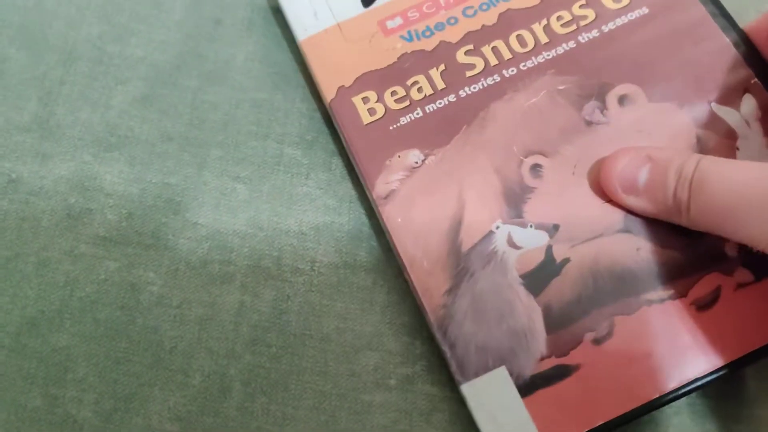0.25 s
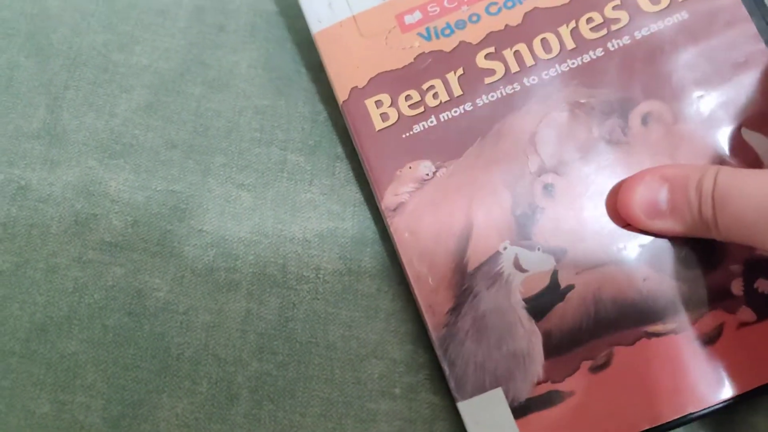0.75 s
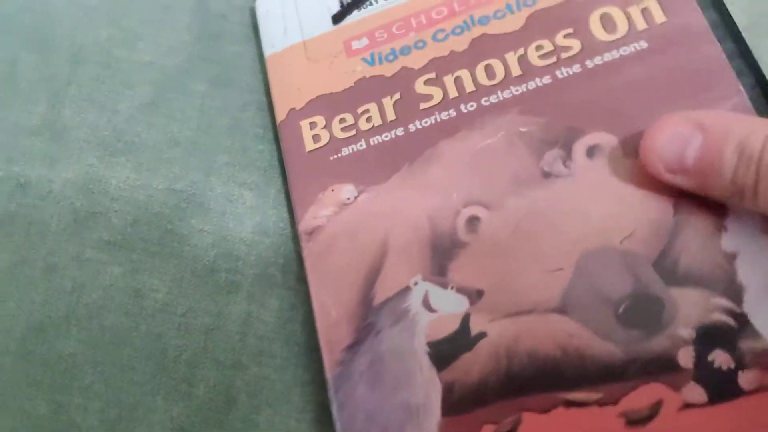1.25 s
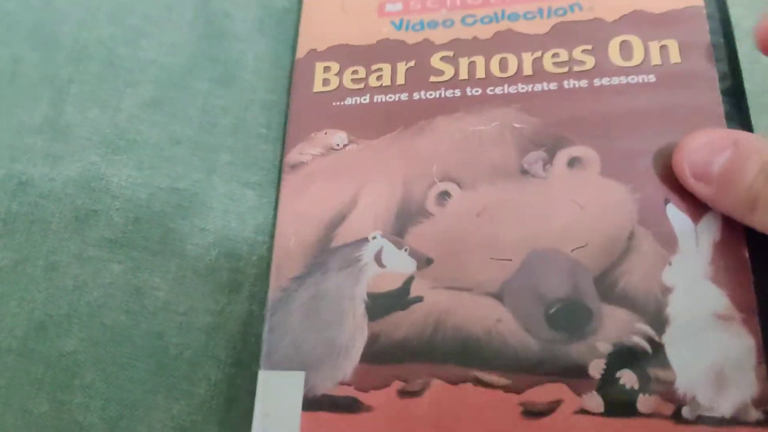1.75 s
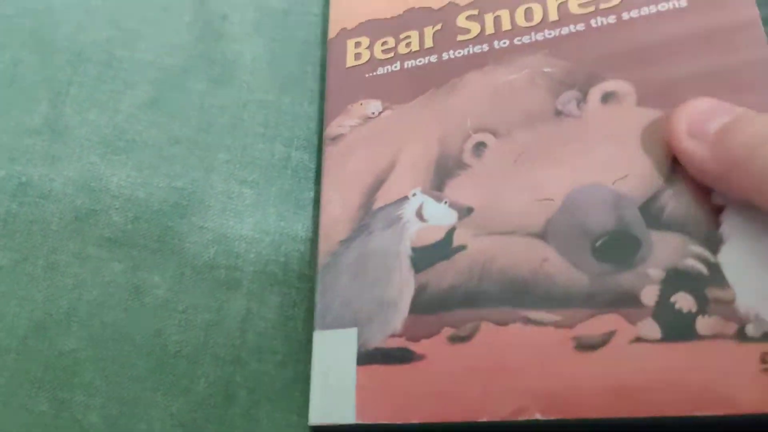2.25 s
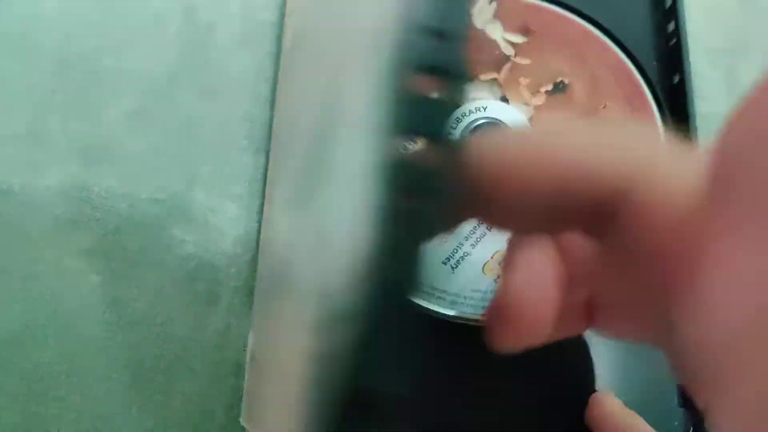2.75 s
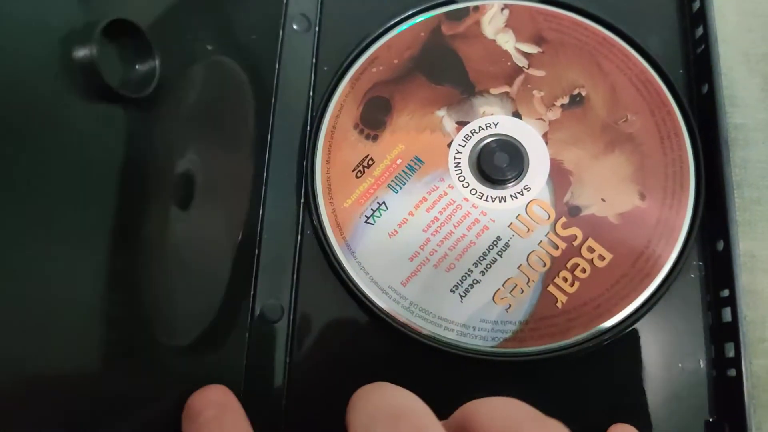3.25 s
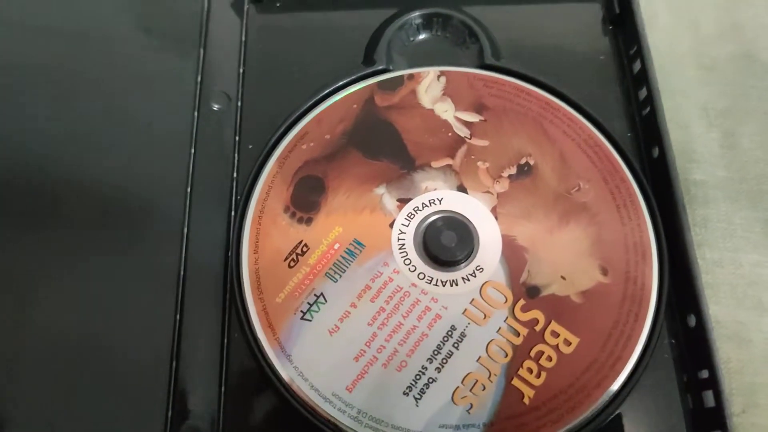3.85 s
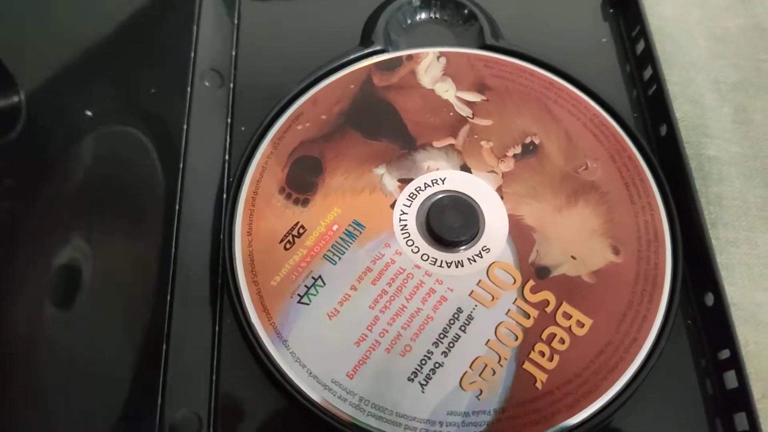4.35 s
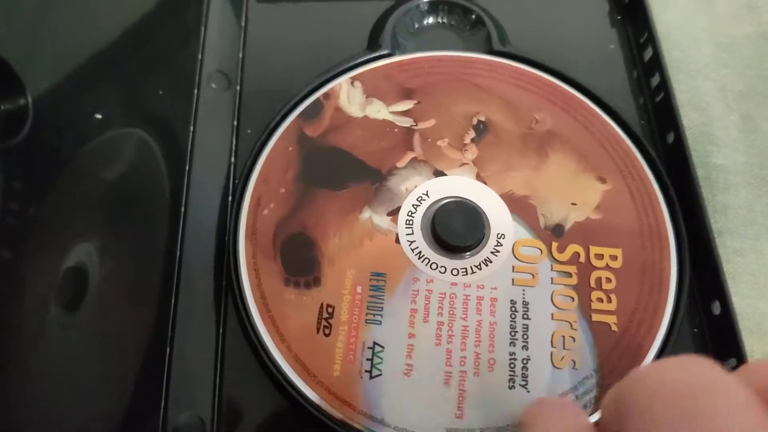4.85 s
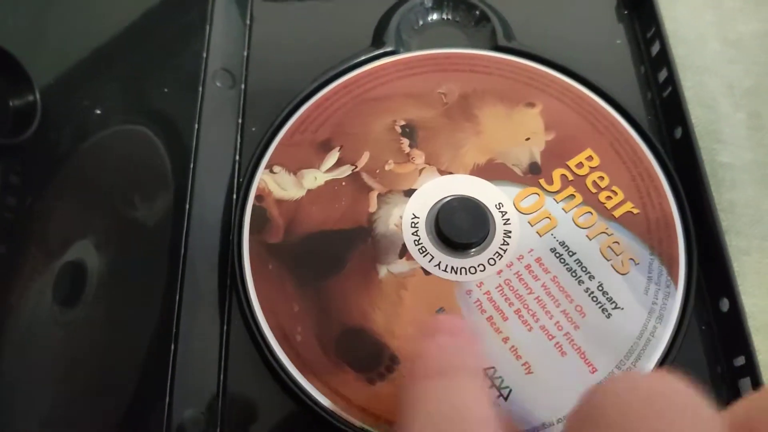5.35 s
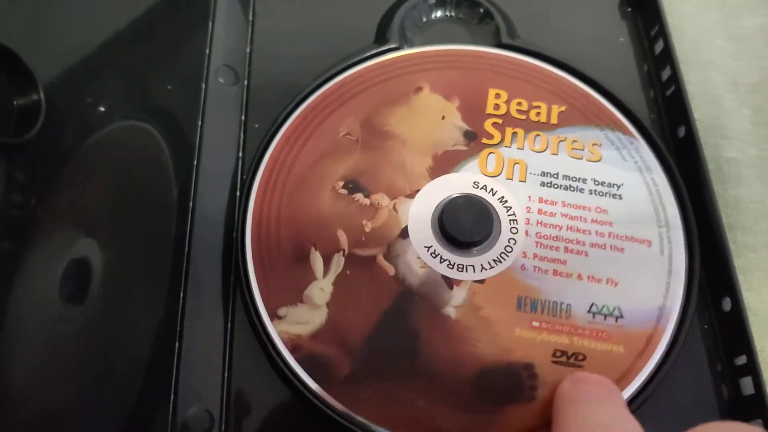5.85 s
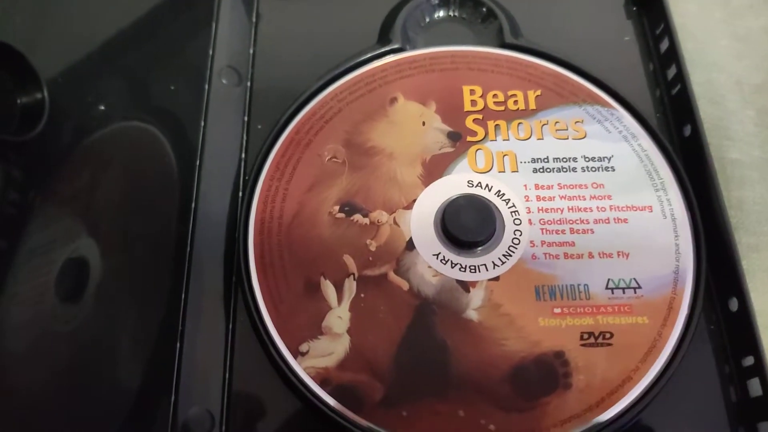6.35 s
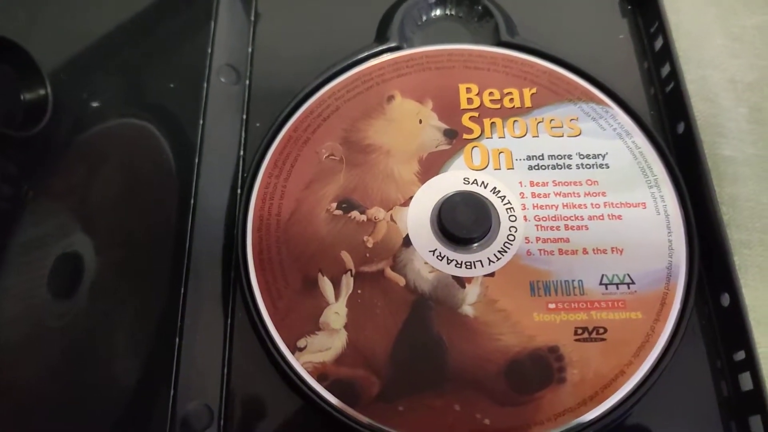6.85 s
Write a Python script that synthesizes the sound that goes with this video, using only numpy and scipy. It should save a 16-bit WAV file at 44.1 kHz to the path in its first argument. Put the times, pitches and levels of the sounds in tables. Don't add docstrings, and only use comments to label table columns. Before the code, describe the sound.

A hollow plastic disc case drops on cloth with a sharp clattering rattle, then soft knocks, faint hinge ticks and bright disc clacks.

```python
import sys
import numpy as np
from scipy import signal
from scipy.fft import rfft, irfft
from scipy.io import wavfile

SR = 44100
rng = np.random.default_rng(int(sys.argv[2]) if len(sys.argv) > 2 else 0)


def wav_out(sig):
    wavfile.write(sys.argv[1], SR, np.round(np.clip(np.atleast_2d(sig).T, -1, 1) * 32767).astype(np.int16))


def ratio(d):
    e = np.asarray(d, float) / 20
    return 10 ** e


N = 313110

# frequency in Hz, left over right in dB.
THIN_PARTS_LEAN = [(60, 4.5), (180, 5.9), (550, 12.9), (1650, 16.2), (4970, 16.8), (15000, 6.23)]


def case():
    # frequency in Hz, level in dB.
    shell_modes = [(65, -9), (115, -6), (155, -4.5), (190, -3.5), (250, -5), (330, -6.5), (470, -20.5),
                   (630, 0.5), (765, 3), (960, 3), (1200, -1.5), (1340, -1), (1600, -3), (1780, 0.5),
                   (2100, -2.5), (2350, -2.5), (2650, 0), (2950, -1), (3250, 0.5), (3600, -11.5),
                   (3950, -2), (4400, -11), (4800, 7), (5200, -0.5), (5600, -39), (6300, -7.5),
                   (7200, -24.5)]
    # frequency in Hz, left over right in dB.
    shell_lean = [(60, -2.5), (180, 3), (550, -1), (1650, 18), (4970, 7), (15000, -5.5)]
    # peak in seconds, level in dB, rise and fall in seconds,
    # treble in dB above that level.
    drags = [(0.01, -64, 0.096, 0.24, 2.1), (.46, -61.5, 0.12, 0.091, -3.5),
             (.64, -67.5, 0.027, 0.21, -5.5), (1.003, -34.5, .004, 0.27, -7.5),
             (1.092, -38, 0.075, 0.078, 5), (1.19, -48.5, 0.088, .13, -8), (1.334, -46, 0.0099, 0.076, 0.5),
             (1.419, -57, .1, 0.18, -4.5), (1.782, -52, .2, 0.13, -4), (1.858, -52, 0.083, 0.037, 2.5),
             (2.01, -66, 0.27, 0.39, -5.5), (2.43, -69.5, 0.15, 0.32, 2.5),
             (2.709, -66.5, 0.073, 0.054, 4.5), (3.6, -67.5, 0.24, 0.59, 2)]
    # time in seconds, peak in dB, thump and treble in dB above the peak.
    grip_shifts = [(0.017, -30, -13, -35), (0.03, -39.5, -33, -30), (0.054, -52.5, -9, -12),
                   (0.095, -47, -12, -8), (0.112, -39.5, -33, -25), (0.127, -48, -32, -30),
                   (0.172, -41.5, -38, -6.5), (0.258, -40.5, -20, -19.5), (0.267, -47.5, -2, -19),
                   (0.334, -50, -10, -36), (0.365, -47.5, -20, -9), (0.38, -40, -12, -16.5),
                   (0.456, -38.5, -4, -7.5), (0.467, -39, -4.5, -34), (0.61, -34.5, -4.5, -0.5),
                   (0.634, -62, -9, -4), (0.708, -52, -1, -10)]
    # time in seconds, peak in dB, thump and treble in dB above the peak,
    # favoured mode in Hz.
    drop_knocks = [(0.882, -44.5, -16, 1.5, 1643), (0.915, -44, -21, -6, 700),
                   (0.998, -14, 3.5, -17.5, 624.7), (1.005, -24.5, 4, -0.5, 505.5),
                   (1.011, -29, -10, -6, 595.6), (1.03, -25.5, -14.5, -10.5, 711.5),
                   (1.041, -23.5, 0, 2, 1103), (1.052, -20, -27, 2, 1238), (1.068, -10, -0.5, -2, 960),
                   (1.074, -9.5, -7, -8, 967), (1.084, -22.5, -22.5, 1.5, 1197),
                   (1.094, -21.5, -12.5, -7.5, 631.7), (1.104, -24.5, -24.5, -11.5, 1222),
                   (1.124, -31, -4, -1.5, 1750), (1.166, -26, -6, -16, 796), (1.174, -22, -35, -11.5, 600),
                   (1.187, -25.5, -36, -6.5, 1790), (1.215, -37, -26, -2.5, 1970),
                   (1.246, -27.5, -25, -22, 795)]
    settle_knocks = [
        (1.308, -38, -12, -7, 1430),
        (1.332, -28.5, -4, -6, 1500),
        (1.344, -33.5, -18, -8, 1860),
        (1.363, -48, -2, -13, 1820),
        (1.378, -34.5, -12, -13, 1320),
        (1.402, -32, -29, -18.5, 1930),
        (1.41, -44, -6, -1, 1870),
        (1.444, -40.5, -43, -18, 630),
        (1.469, -45.5, -16, -11, 770),
    ]
    shift_knocks = [(1.635, -43, -29, -30, 620), (1.663, -41.5, -16, -26, 1850), (1.685, -58, -6, -9, 1430),
                    (1.711, -35, -29, -13, 697), (1.714, -36.5, -14, -9.5, 1020),
                    (1.753, -23, -45, -12.5, 950), (1.763, -51.5, 16.5, -13, 1040),
                    (1.787, -30.5, -36, -33, 690), (1.803, -27.5, -6, -13, 702),
                    (1.821, -33.5, -8, -14, 1810), (1.841, -21.5, -9, -9.5, 1120),
                    (1.847, -38.5, 6.5, 4.5, 1290), (1.861, -44, -22, -3, 624), (1.93, -50, -18, -5, 1790),
                    (1.942, -41.5, -7, -9.5, 2100), (1.964, -45, -5, -12, 630), (1.992, -44, -18, -9, 1820),
                    (2.01, -44.5, -6, -10, 837), (2.038, -54, -22, -7, 1750), (2.058, -59, -3, -18, 1770)]
    open_knocks = [
        (2.216, -48, -21, -20, 995),
        (2.251, -49.5, 1, -14.5, 625),
        (2.409, -54, -2, -2, 670),
        (2.438, -45.5, 10.5, -14, 1580),
        (2.564, -41.5, -12, -8.5, 1012),
        (2.707, -40, -9, -13, 895),
    ]

    grip_hz = 650
    grip = [tuple(row) + (grip_hz,) for row in grip_shifts]
    knocks = np.vstack([grip, drop_knocks, settle_knocks, shift_knocks, open_knocks])
    s, db, thump_db, treble_db, struck_hz = knocks.T
    ms = np.where(np.diff(s, prepend=-1) > 0.03, 1.9, 3.1)

    def colour(hz):
        if hz < 400:
            return thump_db
        if hz > 2200:
            return treble_db
        return 11 * np.exp(-(np.log(hz / struck_hz) / .11) ** 2) - 8

    grain = friction(2200, spread_db=4.5) * ratio(-23 + 2 * drift(70))
    drag = grain * strokes(drags)
    bright = grain * strokes(drags, np.transpose(drags)[-1])

    def rub(hz):
        if hz > 2200:
            return bright
        return drag * ratio(-4) if hz < 400 else drag

    return body(shell_modes, (s, db - 7, ms), colour, rub, shell_lean,
                lag_ms=0.18, scatter_db=3.0, crack_db=3.0, damping=1.23)


def disc():
    # frequency in Hz, level in dB.
    disc_modes = [(195, 6), (260, 3.5), (440, -4.5), (600, -3.5), (670, 1), (900, -0.5), (1250, 3),
                  (1720, -16.5), (1840, -8), (2130, -6), (2260, 3.5), (2600, 10), (2940, -0.5), (3280, 2.5),
                  (3500, -40), (3960, 1), (4370, -2), (4780, -3), (5140, -34), (5480, -58), (6800, -16),
                  (7800, -15)]
    # peak in seconds, level in dB, rise and fall in seconds.
    slides = [(4.74, -53.5, 0.0065, 0.12), (4.84, -51.5, 0.059, 0.051), (4.9, -52.5, 0.018, 0.068),
              (5.125, -62, 0.0057, 0.36), (5.2, -48, 0.041, 0.056), (5.25, -58, .02, 0.097),
              (5.66, -47, 0.071, 0.037), (5.73, -59, 0.072, 0.1), (5.85, -57.5, 0.078, 0.18),
              (6.1, -63, 0.11, 0.1), (6.3, -55, 0.0098, .07)]
    # time in seconds, peak in dB, body in dB
    hub_clacks = [(4.4183, -59, -2), (4.5506, -65, 1), (4.7257, -34, 2.5), (4.7286, -25, -6),
                  (4.7843, -49.5, 7), (4.8681, -45.5, 0.5), (4.8842, -42.5, -0.5), (4.891, -30, -8.5),
                  (4.9181, -40.5, -3), (4.9261, -38, -19), (4.9626, -39, -2.5), (4.9764, -43, -2.5),
                  (5, -48.5, -23), (5.1095, -29.5, -9), (5.1143, -27.5, 1), (5.13, -36.5, 0),
                  (5.2124, -44, 10), (5.224, -41, 2), (5.2502, -37, -0.5), (5.2585, -28.5, -15),
                  (5.2875, -52, 4), (5.3014, -36.5, 1.5), (5.3118, -47, 7), (5.3244, -49.5, 9.5),
                  (5.3436, -53.5, 3),
                  (5.5378, -18, -7), (5.5616, -32, -2), (5.6604, -45, 4), (5.6704, -40, -26),
                   (5.7029, -35.5, -8.5), (5.7147, -28, -10), (5.7392, -43, -1.5), (5.752, -56, -20),
                   (6.1462, -38, -3), (6.1635, -41.5, -5.5), (6.1735, -50.5, 3), (6.2915, -43, -3),
                   (6.307, -42.5, -4), (6.3172, -46.5, 3), (6.3268, -49, -2), (6.3443, -52, -3.5),
                   (6.3666, -59.5, 0)]

    s, db, body_db = np.array(hub_clacks).T

    def colour(hz):
        if hz < 400:
            return body_db - 7
        if hz < 1500:
            return body_db
        return 0.13 * (db + 26) if hz > 5800 else 0

    swell = strokes(slides)
    scrape = friction(4700, spread_db=2.5) * swell * ratio(0.47 * drift(45))

    def rub(hz):
        return scrape * ratio(-42 if hz < 1500 else -40)

    ms = np.clip(2.4 + .07 * (db + 35), 1, 4)
    clacks = body(disc_modes, (s, db - 12.5, ms), colour, rub, THIN_PARTS_LEAN,
                  lag_ms=-0.21, scatter_db=2.94, crack_db=-4.5, damping=1.1)
    rasp = 0
    for hz in (2400, 3800, 4800):
        lobe = signal.iirpeak(hz, 4.0, fs=SR)
        rasp = rasp + signal.lfilter(*lobe, signal.lfilter(*lobe, scrape))
    edge = ratio(38) * swell * band(scrape, 4500, 13500)
    return clacks + ratio([[9], [-3]]) * rasp + edge


def hinge():
    # frequency in Hz, level in dB.
    spine_modes = [(130, -6), (250, -9), (450, -7), (1600, -6.5), (2300, -3.5), (4950, -2.5), (8700, -10.5),
                   (11000, -6)]
    # time in seconds, peak in dB.
    stray_slips = [
        (3.714, -52),
        (3.7666, -54),
        (3.8007, -47.5),
        (3.8557, -47.5),
    ]

    fold_s, gap_s, jitter_s = 3.493, 0.01, 0.0013
    peak_s, peak_db, spread_db = 3.6, -45, 1.6
    fade_db = 6.5
    chance = rng.standard_normal((17, 2))
    run = fold_s + gap_s * np.arange(len(chance)) + jitter_s * chance[:, 0]
    run_db = peak_db - fade_db * (10 * (run - peak_s)) ** 2 + spread_db * chance[:, 1]
    s, db = np.hstack([[run, run_db], np.transpose(stray_slips)])
    ticks = (s, db - 3, np.full(len(s), .5))
    return body(spine_modes, ticks, lambda hz: 0, lambda hz: 0, THIN_PARTS_LEAN,
                lag_ms=0.096, scatter_db=0.5, crack_db=-8.0, damping=1.4)


def body(modes, knocks, knock_db, rub, side, lag_ms, scatter_db, crack_db, damping):
    at, level_db, ms = knocks
    clumps = np.array([contact(m) for m in ms])
    chance = rng.standard_normal((len(at), len(modes)))
    turn = rng.standard_normal(len(modes))
    busy = slice(max(int((min(at) - .2) * SR), 0), int((max(at) + 1.3) * SR))

    def port_gap(hz):
        return min(hz / 2600, 1) ** 2

    def force_at(hz, mode_db, luck, is_mode):
        apart = port_gap(hz)
        right = (1 - .5 * apart) * clumps[:, 0] + apart * clumps[:, 1]
        hits = np.stack([clumps[:, 0], right], axis=1)
        if hz < 140:
            hits = clumps[:, [2, 2]]
        size = np.sqrt(np.sum(hits ** 2, axis=2))
        if is_mode:
            wave = np.exp(-2j * np.pi * hz / SR * np.arange(700))
            size = np.maximum(np.abs(hits @ wave), .3 * size)
        gains = ratio(level_db + knock_db(hz) + scatter_db * luck)[:, None] / (size + 1e-12)
        force = np.full((2, N + 700), 1e-18)
        for s, hit, gain in zip(at, hits, gains):
            start = round(s * SR)
            force[:, start:start + 700] += gain[:, None] * hit
        lean_db = np.outer([.5, -.5], at_hz(side, hz))
        return (force[:, :N] + rub(hz)) * ratio(mode_db + lean_db)

    out = np.zeros((2, N))
    for k, (hz, mode_db) in enumerate(modes):
        w = 2 * np.pi * hz / SR
        force = force_at(hz, mode_db, chance[:, k], True)
        t60 = (.013 + 13 / hz) / damping
        r = ratio(-60 / (t60 * SR))
        near = signal.lfilter(*signal.iirpeak(hz, 1.6, fs=SR), force[:, busy])
        right_phase = 2 * np.pi * hz * lag_ms / 1e3 + 3.0 * port_gap(hz) * turn[k]
        for c, phase in enumerate([0, right_phase]):
            taps = [np.sin(phase), r * np.sin(w - phase)]
            out[c, busy] += signal.lfilter(taps, [1, -2 * r * np.cos(w), r * r], near[c])
    rings = signal.sosfilt(signal.butter(2, 6800, fs=SR, output="sos"), out)
    return rings + band(force_at(7000, crack_db, chance[:, 0], False), 5000, 12500)


def contact(ms):
    t = np.arange(700) / np.clip(ms, .2, 7) / SR * 1e3
    chance = rng.random((2, 2, 700))
    push = t ** 2 * np.exp(-3 * t)
    return np.vstack([push * (chance[0] - .5) * (chance[1] < .5), push])


def friction(per_s, spread_db):
    near, far = grains(per_s, spread_db), grains(per_s, spread_db)
    return np.array([near, near + 0.66 * far])


def grains(per_s, spread_db):
    born = rng.random(N) < per_s / SR
    size = ratio(spread_db * np.minimum(rng.exponential(1, N), 4))
    return rms_one(born * size * rng.choice([-1, 1], N))


def strokes(rows, lift_db=0):
    s, db, rise, fall = np.transpose(rows)[:4, :, None]
    t = np.arange(0, N + 32, 32) / SR
    off = np.where(t < s, (s - t) / np.maximum(rise, 1e-3), (t - s) / np.maximum(fall, 1e-3))
    swell_db = db + np.reshape(lift_db, (-1, 1)) - 20 * off ** 1.9
    power = ratio(2 * np.maximum(swell_db, -150))
    return np.interp(np.arange(N) / SR, t, np.sqrt(power.sum(axis=0)))


def skin():
    # peak in seconds, level in dB, rise and fall in seconds.
    skin_slides = [
        (1.085, -47, 0.029, .055),
        (1.17, -67, .05, .13),
        (1.36, -72, 0.077, 0.23),
        (3.0, -70, .09, 0.1894),
        (3.6, -100.5, 0.23, 0.23),
    ]
    hiss = np.array([grains(6000, spread_db=-3.5), grains(6700, spread_db=4.0)])
    shared = rms_one(band(hiss + 0.27 * hiss[::-1], 2900, 14500))
    return strokes(skin_slides) * ratio(0.79 * drift(32)) * shared


def tremor():
    # peak in seconds, level in dB, rise and fall in seconds.
    jolts = [
        (0.01, -56, .1, 0.28),
        (.47, -64, 0.18, 0.17),
        (1.04, -34.5, 0.021, 0.26),
        (1.35, -52.5, .2, 0.24),
        (1.85, -62, 0.31, .4),
        (2.71, -65.5, .06, 0.33),
        (4.4, -65.5, 0.54, 0.28),
        (5.57, -58, 0.079, 0.12),
    ]
    hz = np.arange(N // 2 + 1) * SR / N + 1
    wobble = irfft(pair(.75) / (1 + (hz / 35) ** 2) * hz / (hz + 8), N)
    rest = ratio(-66)
    return (strokes(jolts) + rest) * ratio([[4.5], [-.5]]) * rms_one(wobble)


def room(x):
    t60_s, level_db = .2, -20
    t = np.arange(SR // 2) / SR
    tail = band(rng.standard_normal((2, len(t))), 210, 4100) * ratio(-60 * t / t60_s) * (t > .004)
    tail = tail / np.sqrt(np.sum(tail ** 2, axis=1, keepdims=True))
    return ratio(level_db) * signal.fftconvolve(x, tail, axes=1)[:, :N]


def air():
    # frequency in Hz, level in dB per Hz.
    tone = [(41, -29.5), (70, -11.5), (96, -37.5), (155, -3), (178, -11), (344, -13), (606, -20),
            (727, -20.5), (2660, -22.5), (2980, -24), (4910, -29), (5890, -36), (16000, -29.5)]
    # frequency in Hz, left over right in dB.
    tone_lean = [(60, 1.8), (180, 1.7), (550, 2.9), (1650, 6), (4970, 11), (15000, 1.4)]
    # frequency in Hz, likeness (1 = the same).
    likeness = [(60, -2), (240, 0.41), (950, 0.77), (3770, -1.7), (15000, -1.2)]
    # centre in Hz, width in Hz, level in dB.
    hums = [(60.9, 8.8, -81.5), (146.8, 8.4, -80.5), (344, 11, -89.5), (4932, 470, -80.5)]

    hz = np.arange(N // 2 + 1) * SR / N + 1
    alike = at_hz(likeness, hz)
    lean = ratio(np.outer([.5, -.5], at_hz(tone_lean, hz)))
    hiss = pair(alike) * ratio(at_hz(tone, hz)) * (hz > 60)
    out = ratio(-71) * rms_one(irfft(hiss, N))
    for centre_hz, width_hz, db in hums:
        peak = 1 / (1 + (2 * (hz - centre_hz) / width_hz) ** 4)
        out += ratio(db + 0.69 * drift(2)) * rms_one(irfft(pair(alike) * peak, N))
    return irfft(rfft(out) * lean, N)


def pair(likeness):
    mid, side = rfft(rng.standard_normal((2, N)))
    alike = np.clip(likeness, 0, 1)
    return np.sqrt(1 + alike) * mid + np.sqrt(1 - alike) * side * np.array([[1], [-1]])


def drift(rate):
    knots = rng.standard_normal(800)
    return np.interp(np.arange(N) / SR * rate, np.arange(800), knots)


def at_hz(points, hz):
    points_hz, values = np.transpose(points)
    return np.interp(np.log(hz), np.log(points_hz), values)


def rms_one(x):
    return x / np.sqrt(np.mean(x ** 2) + 1e-20)


def band(x, low_hz, high_hz):
    edges_hz = [low_hz, min(high_hz, .45 * SR)]
    return signal.sosfilt(signal.butter(2, edges_hz, "band", fs=SR, output="sos"), x)


def scene():
    plastic = case() + disc() + hinge()
    return plastic + room(plastic) + skin() + air() + tremor()


def band_limit(x):
    return signal.sosfilt(signal.butter(12, 15700, fs=SR, output="sos"), x)


def record(dry):
    return band_limit(dry)


dry = scene()
out = record(dry)
wav_out(out)
```